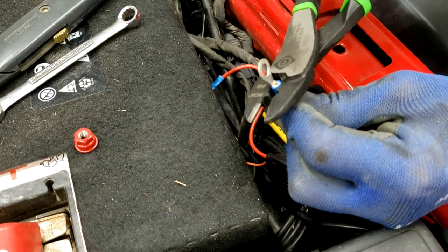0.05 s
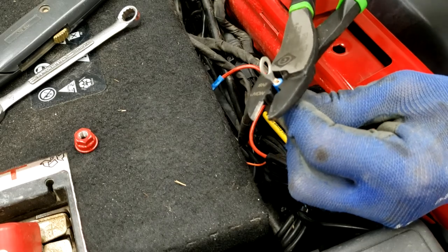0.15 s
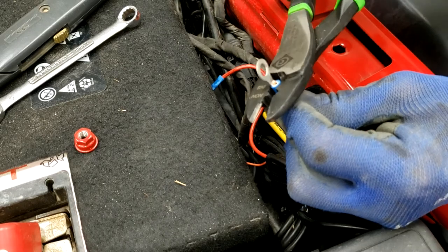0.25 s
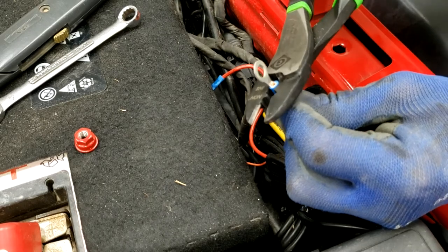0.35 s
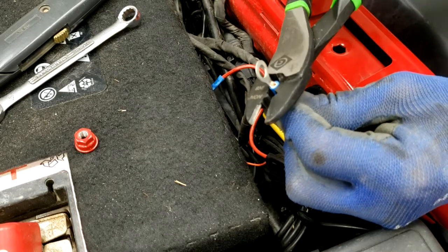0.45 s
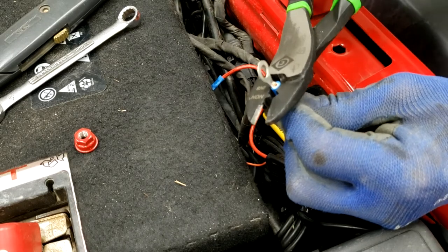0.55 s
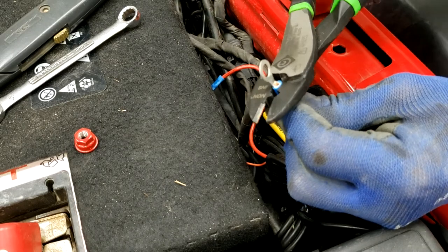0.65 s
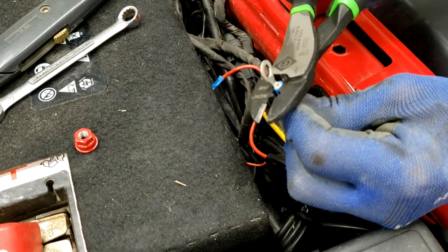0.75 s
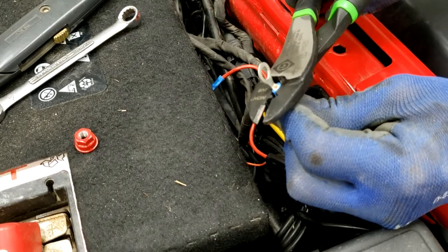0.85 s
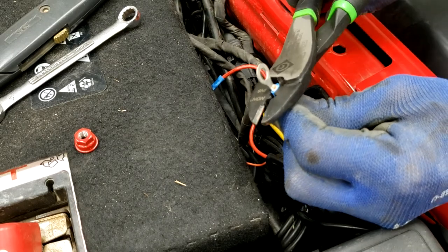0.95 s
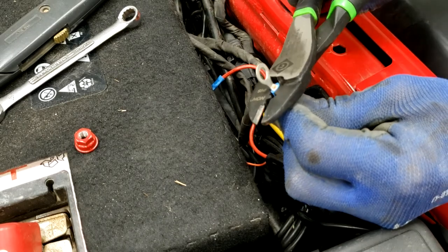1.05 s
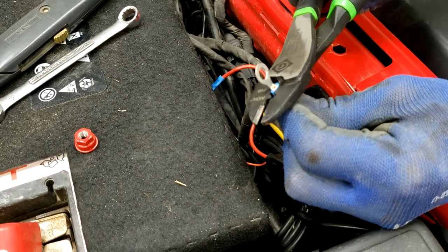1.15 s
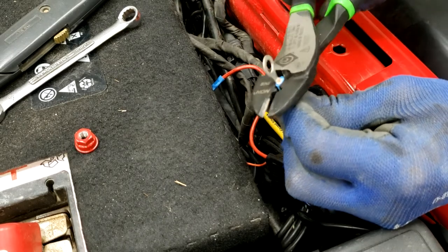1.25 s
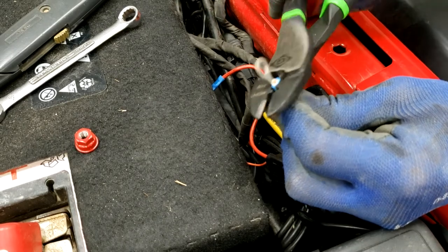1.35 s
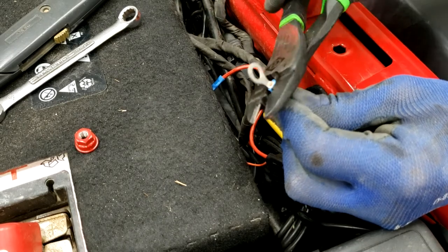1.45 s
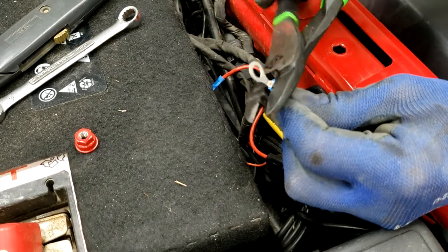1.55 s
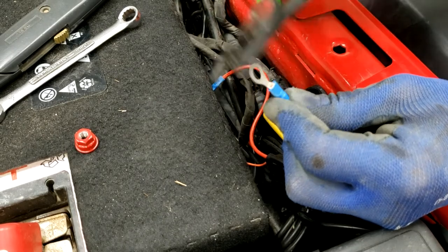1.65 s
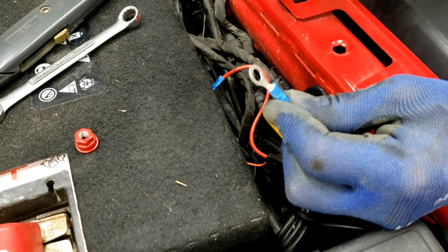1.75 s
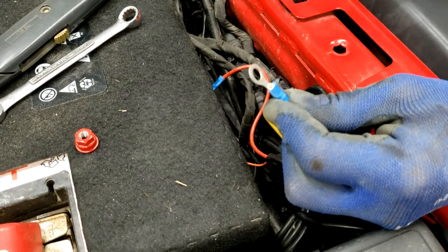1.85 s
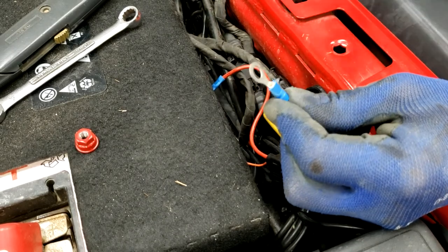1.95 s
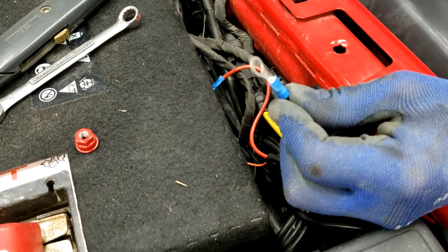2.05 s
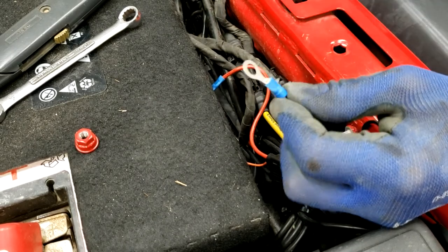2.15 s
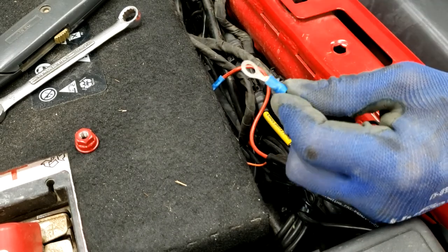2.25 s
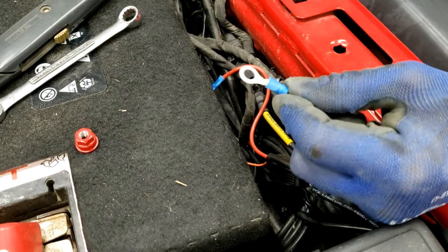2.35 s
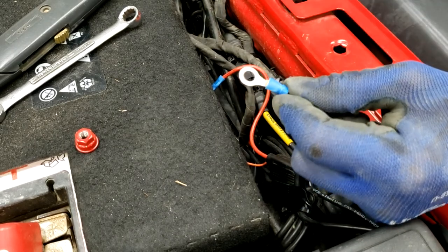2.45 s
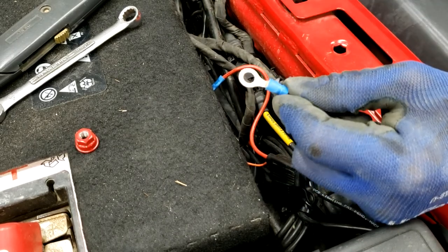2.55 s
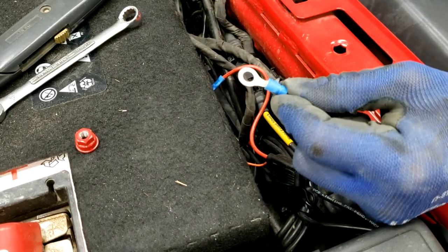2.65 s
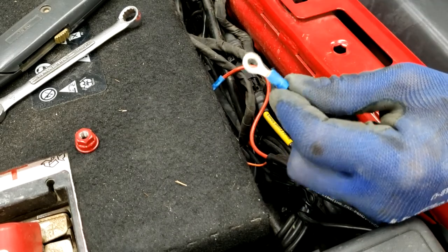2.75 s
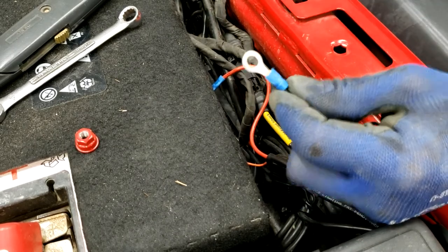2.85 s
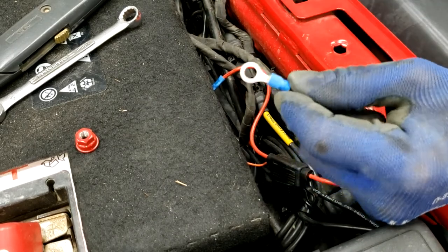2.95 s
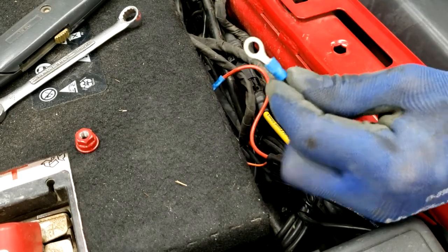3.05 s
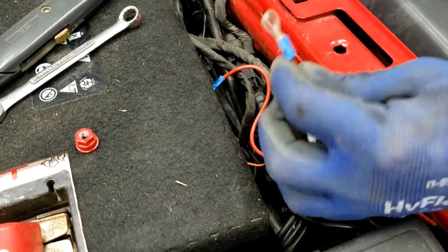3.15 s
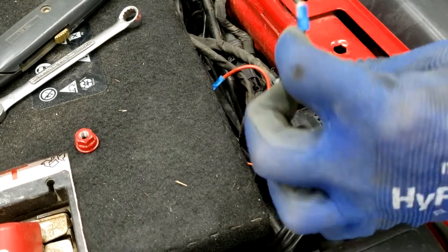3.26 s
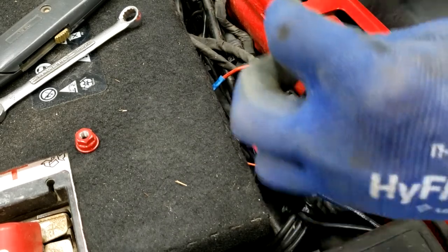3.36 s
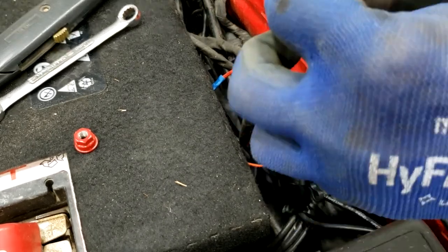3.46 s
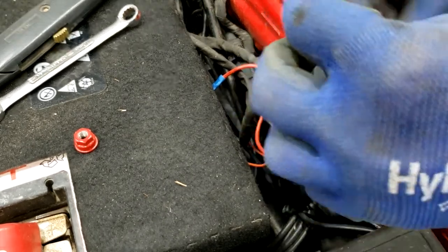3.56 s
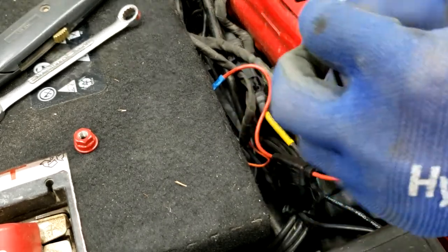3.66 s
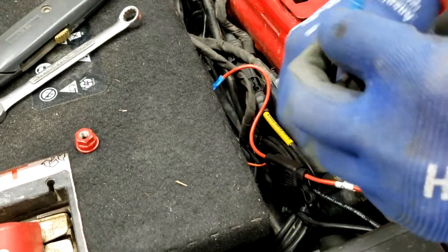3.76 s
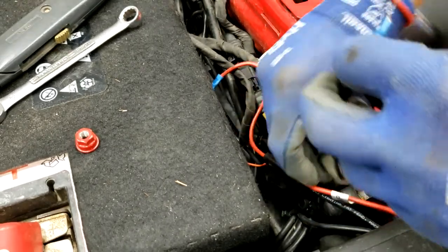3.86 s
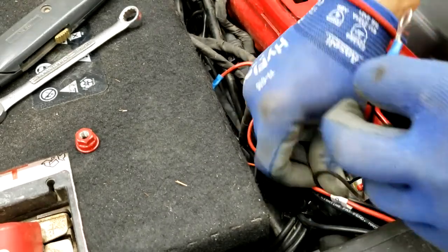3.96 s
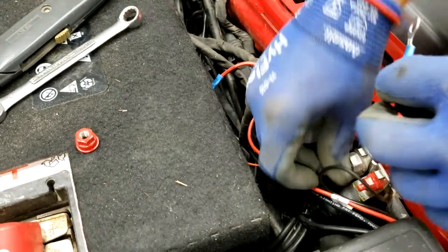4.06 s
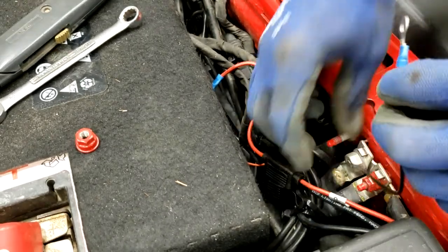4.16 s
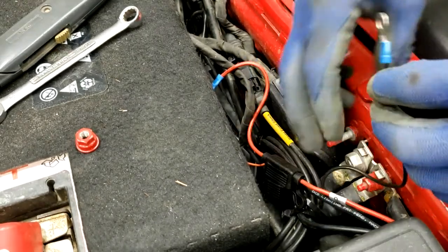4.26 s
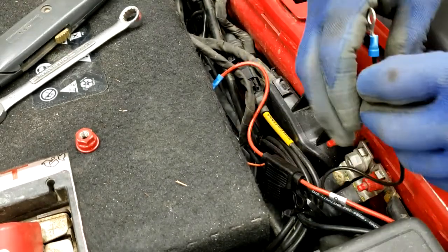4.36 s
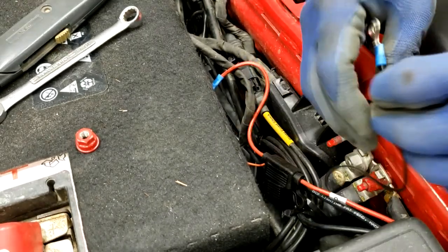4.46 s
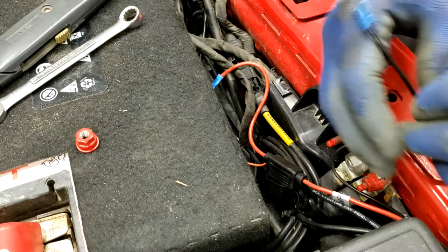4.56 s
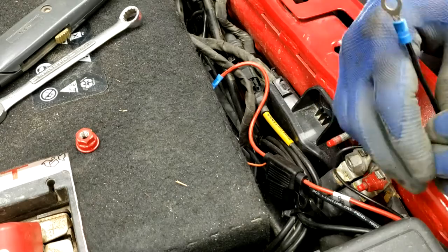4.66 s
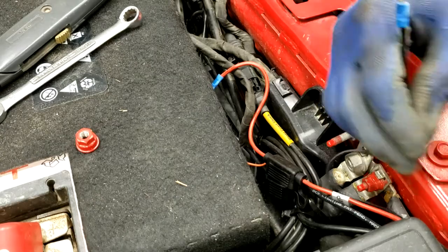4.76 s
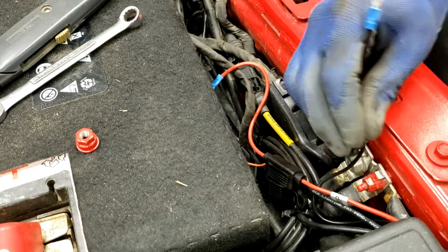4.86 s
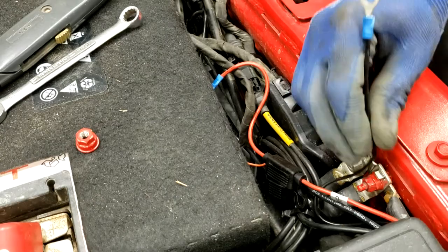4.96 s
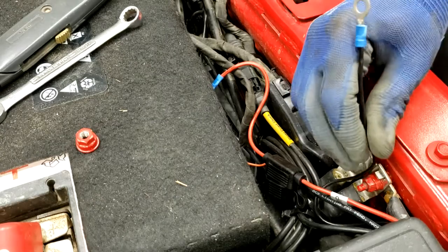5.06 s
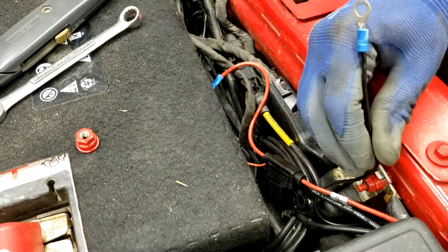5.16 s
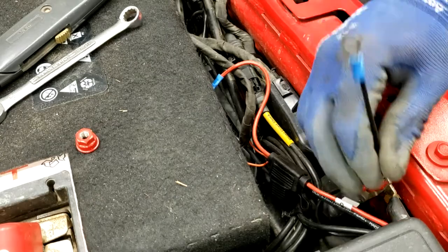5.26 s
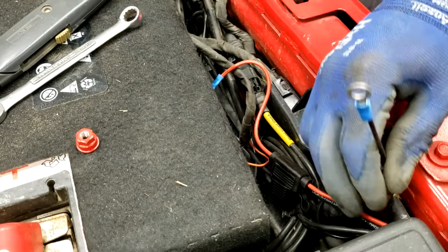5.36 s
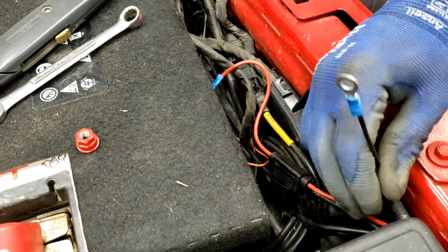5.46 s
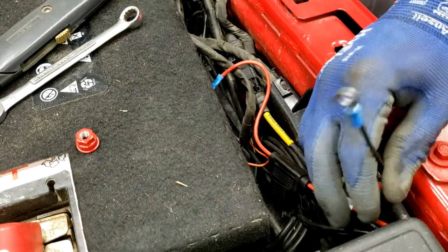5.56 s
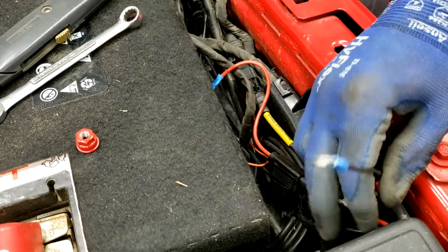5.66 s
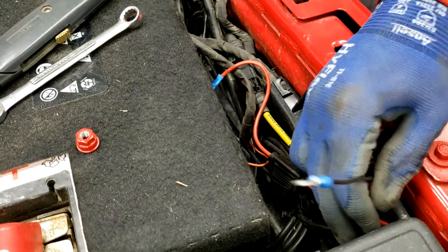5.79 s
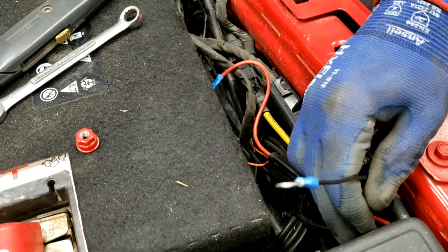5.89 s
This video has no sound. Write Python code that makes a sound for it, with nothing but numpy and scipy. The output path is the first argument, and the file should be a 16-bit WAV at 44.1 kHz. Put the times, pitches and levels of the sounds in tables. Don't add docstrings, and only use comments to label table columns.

```python
import sys
import numpy as np
from scipy import signal
from scipy.fft import rfft, irfft, next_fast_len
from scipy.io import wavfile

SR = 44100
rng = np.random.default_rng(int(sys.argv[2]) if len(sys.argv) > 2 else 0)


def boost(x):
    u = np.asarray(x, float) / 20
    return 10 ** u


def transcribe(u):
    v = np.clip(np.atleast_2d(u).T, -1, 1)
    q = np.round(v * 32767).astype(np.int16)
    wavfile.write(sys.argv[1], SR, q)


N = 261287

# frequency_hz, level_db, t60_s
HOLLOW_MODES = [(142.6, -9, 0.19), (248.4, -11, 0.14), (278, 4.5, 0.13), (347, -19, .08), (424, -3, 0.14),
                (502.5, 2.5, 0.14), (615, -21, 0.06), (825, -23, .08), (1210, 10, 0.025),
                (1780, -10, 0.023), (2720, 3, 0.028), (3930, -17, .02), (5070, -16, .04)]
# frequency_hz, level_db, t60_s
COVER_MODES = [(79.4, -8, 0.11), (120.3, -12, 0.35), (147, -11, 0.21), (194.6, -1.5, 0.064),
               (225.5, 2.5, 0.068), (294, -3, 0.022), (310, -1.5, 0.043), (462, -8.5, 0.045),
               (520, -15, 0.04), (776, -2, 0.01), (840, -22, 0.028), (1010, -27, 0.018),
               (1178, -20.5, 0.059), (1740, -4, 0.022), (2310, -13, 0.028)]
# frequency_hz, density_db_per_hz
CRACK_SPECTRUM = [(290, -4), (500, -3.5), (1210, -15), (2460, -17.5), (3290, -22.5), (4210, -31),
                  (9090, -48), (10700, -39.5), (14700, -50), (16000, -55)]
# frequency_hz, density_db_per_hz
SNAP_SPECTRUM = [(300, -15), (600, -6.5), (900, -11), (1350, -8), (2210, -20), (2800, -17.5), (3630, -26),
                 (5050, -23), (7940, -36), (9760, -27.5), (16000, -48)]


def rms_one(x):
    return x / np.sqrt(np.mean(x ** 2) + 1e-20)


def filtered(x, order, hz, kind="low"):
    return signal.sosfilt(signal.butter(order, hz, kind, fs=SR, output="sos"), x)


def in_time(rows):
    s, *columns = np.transpose(rows)
    return [np.interp(np.arange(N) / SR, s, c, left=-150, right=-150) for c in columns]


def at_hz(points, hz):
    table_hz, values = np.array(points).T
    return np.interp(np.log(hz), np.log(table_hz), values)


def drift(rate):
    r = np.exp(-80 * np.pi * rate / SR)
    noise = rng.standard_normal(N // 40 + 2002)
    slow = signal.lfilter([1], [1, -2 * r, r * r], noise)[2000:]
    return np.interp(np.arange(N) / 40, np.arange(len(slow)), rms_one(slow))


def swells(rows, rise_s, fall_db_per_s):
    t = np.arange(N) / SR
    total = 0
    for s, db, hold in rows:
        fall_db = fall_db_per_s * np.maximum(t - s - hold, 0)
        total = total + boost(db - fall_db) * np.clip(1 + (t - s) / rise_s, 0, 1)
    return total


def coloured(x, spectrum):
    size = next_fast_len(x.shape[-1])
    hz = np.maximum(np.fft.rfftfreq(size, 1 / SR), 1)
    return irfft(rfft(x, size) * boost(at_hz(spectrum, hz)), size)[..., :x.shape[-1]]


def resonate(x, hz, width_hz):
    r = np.exp(-np.pi * width_hz / SR)
    poles = [1, -2 * r * np.cos(2 * np.pi * hz / SR), r * r]
    return signal.lfilter([(1 - r * r) / 2, 0, (r * r - 1) / 2], poles, x)


def resonate_twice(x, hz, width_hz):
    return resonate(resonate(x, hz, width_hz), hz, width_hz)


def ringing(force, hz, t60):
    r, w = boost(-60 / (t60 * SR)), 2 * np.pi * hz / SR
    return signal.lfilter([0, np.sin(w)], [1, -2 * r * np.cos(w), r * r], force)


def shaken(modes):
    return rms_one(sum(boost(db) * ringing(rng.standard_normal(N), hz, t60) for hz, db, t60 in modes))


def strike(blows, modes, scatter_db):
    first = round(blows[0][0] * SR)
    span = round((blows[-1][0] - blows[0][0] + .6) * SR)
    out = np.zeros(N + SR)
    luck = rng.standard_normal((len(blows), 16))
    t = np.arange(int(SR * .012)) / SR
    for k, (hz, mode_db, t60) in enumerate(modes):
        force = np.full(span, 1e-18)
        for (s, blow_db, ms), chance in zip(blows, luck):
            push = np.sin(np.pi * np.minimum(t / (max(ms, .05) / 2000), 1))
            gain = boost(blow_db + mode_db + scatter_db * chance[k])
            force[max(round(s * SR) - first, 0):][:len(t)] -= push / push.sum() * gain
        out[first:first + span] += (-1) ** (k // 3) * ringing(force, hz, t60)
    return out[:N]


def burst(ms):
    t = np.arange(int(.12 * SR)) / SR
    shared, own = rng.standard_normal(len(t)), rng.standard_normal((2, len(t)))
    return (0.64 * shared + 1.58 * own) * boost(-60000 * t / max(ms, 2)) * (1 - np.exp(-t / 0.00026))


def grainy(per_s, spread_db):
    sizes = boost(spread_db * np.minimum(rng.exponential(1, N), 3)) * (rng.random(N) < per_s / SR)
    return rng.standard_normal((2, N)) * (1 + sizes) + 0.09 * rng.standard_normal(N)


def add(out, s, sound):
    i = round(s * SR)
    out[:, i:i + sound.shape[1]] += sound[:, :N - i]


def pan(x, db):
    return x * boost(np.array([[db / 2], [-db / 2]]))


def lagged(x, count):
    return np.array([np.roll(x[0], count), x[1]])


def narrowed(x):
    side = filtered((x[0] - x[1]) / 2, 2, 1070, "high")
    return x.mean(axis=0) + side * [[1], [-1]]


def tool(table, modes, spectrum, crack_ms, scatter_db, shock_db):
    body = strike([(s, db, ms) for s, db, _, ms in table], modes, scatter_db)
    crack, shock = np.zeros((2, N)), np.zeros((2, N))
    for s, _, crack_db, ms in table:
        keep = np.exp(-2 * np.pi * 16000 / ms ** 2.4 / SR)
        add(crack, s, boost(crack_db) * signal.lfilter([1 - keep], [1, -keep], burst(crack_ms)))
        jerk = np.hanning(int(ms * SR / 1200) + 3) * [[1], [1]]
        add(shock, s, -boost(crack_db + shock_db) * jerk)
    return body + shock + boost(21.0) * coloured(crack, spectrum)


def workshop():
    # time_s, level_db
    hum = [(0, -45.5), (1.3, -46.5), (2.1, -47), (2.9, -48.5), (4.44, -49.5), (5.15, -45), (5.925, -46)]
    # frequency_hz, density_db_per_hz
    air_spectrum = [(15, -66), (25, -48), (49, -5), (62, -26), (76, 4), (92, 0), (118, -5.5), (179, -4),
                    (253, -5.5), (301, -4), (630, -10), (846, -6), (1250, -13.5), (2440, -20), (9000, -54),
                    (11700, -91), (19800, -120)]
    # frequency_hz, width_hz, level_db
    machines = [(81.3, 16, -66.5), (191.5, 26.4, -58.5), (301.6, 36, -59), (433.4, 81, -59),
                (828, 37, -61.5)]
    # frequency_hz, left_right_likeness
    likeness = [(60, 0.93), (180, 1), (550, 0.46), (1650, -0.29), (4970, -0.11), (15000, -0.03)]
    # frequency_hz, left_right_db
    balance = [(60, 0), (240, -2.5), (950, 0), (3770, 5.5), (15000, 27)]
    size = next_fast_len(N)
    hz = np.maximum(np.fft.rfftfreq(size, 1 / SR), 1)
    mid, side = rfft(rng.standard_normal((2, size)))
    alike, lean = np.clip(at_hz(likeness, hz), 0, 1), boost(at_hz(balance, hz) / 2)
    mid, side = np.sqrt(1 + alike) * mid, np.sqrt(1 - alike) * side
    pair = np.array([(mid + side) * lean, (mid - side) / lean])
    air = boost(1.5) * rms_one(irfft(pair * boost(at_hz(air_spectrum, hz)), size)[:, :N])
    air = air * boost(.6 * drift(6))
    drones = sum(boost(db + 47) * rms_one(resonate_twice(rng.standard_normal(N), f, width))
                 for f, width, db in machines)
    return boost(in_time(hum)[0]) * (air + drones)


def shop_echo(x):
    t60_s, wall_hz = 0.3, 3220
    size = next_fast_len(N + SR)
    hz, spectrum = np.fft.rfftfreq(size, 1 / SR), rfft(x, size)
    out = np.zeros((2, len(hz)), complex)
    for k, lag in enumerate(rng.uniform(.012, .045, 12)):
        delay = np.exp(-2j * np.pi * hz * lag)
        loop = boost(-60 * lag / t60_s) / (1 + 1j * hz / wall_hz / 4) * delay
        out[k % 2] += (-1) ** (k // 2) * loop / (1 - loop) * spectrum / (1 + 1j * hz / wall_hz)
    return irfft(out, size)[:, :N]


def gloves():
    # start_s, length_s, level_db, dark_part_db
    rubs = [(0.187, 0.13, -56.5, 2.5), (0.862, 0.054, -65, 2), (1.363, 0.11, -57, 3), (1.433, 0.14, -58, 2),
            (1.65, 0.085, -57.5, 1), (1.918, 0.13, -76, 15.5), (2.212, 0.083, -49, 10),
            (2.285, 0.057, -47.5, 8.5), (2.327, 0.21, -61.5, 15), (2.487, 0.29, -73.5, 14),
            (3.093, 0.12, -69, -13), (3.211, 0.086, -68.5, 12), (3.766, 0.15, -65, 8.5),
            (3.821, 0.054, -68, 15.5), (4.105, 0.069, -75, 2), (4.481, 0.061, -65, 3),
            (4.579, 0.029, -61, 15.5), (4.644, 0.019, -66, 17.5), (4.736, 0.052, -50, -8),
            (4.822, 0.1, -64, 1), (4.86, 0.088, -63, 9), (4.947, 0.1, -64, -12)]
    # start_s, length_s, level_db, dark_part_db
    moves = [
        (1.498, 0.99, -72.5, 10),
        (3.1, 0.4, -70, -3),
        (3.604, 1, -71, 8),
        (4.495, 0.62, -64.5, 7.5),
    ]
    # start_s, length_s, level_db, pitch_hz
    swishes = [(3.096, 0.13, -68, 11400), (3.2, 0.27, -80, 9500), (4.73, .045, -55, 5600),
               (5.1, .2, -61, 9400), (5.599, 0.35, -60, 3900), (3.757, .1, -75, 10900),
               (5.476, .06, -58, 12000)]
    # frequency_hz, density_db_per_hz
    knit = [(1470, -4), (2500, -2), (4480, -8.5), (5610, -8.5), (8660, -11.5), (11100, -6.5), (15200, -11),
            (16000, -34)]
    rub = rms_one(coloured(grainy(per_s=1500, spread_db=3.5), knit))
    rub = rub * boost(3.0 * drift(40))
    dull = filtered(rub, 2, 7000)
    out = np.zeros((2, N))
    for s, length, rub_db, dull_db in rubs + moves:
        i, swell = round(s * SR), np.linspace(0, 1, int(length * SR))
        stroke = (rub - dull + boost(dull_db) * dull)[:, i:i + len(swell)]
        add(out, s, boost(rub_db) * np.sin(np.pi * swell ** 0.41) * stroke)
    for s, length, swish_db, hz in swishes:
        swell = np.hanning(int(length * SR))
        slide = rms_one(resonate_twice(rng.standard_normal((2, len(swell))), hz, 1500))
        add(out, s, boost(swish_db) * swell ** .5 * slide)
    return pan(out, 0.95)


def wire():
    # time_s, level_db
    pull = [(5.042, -49.5), (5.085, -50), (5.15, -46), (5.3, -56.5), (5.355, -51.5), (5.41, -60),
            (5.44, -54), (5.475, -55), (5.505, -44), (5.58, -65), (5.76, -64.5), (5.85, -57), (5.93, -65)]
    # frequency_hz, width_hz, level_db
    harness = [(2760, 98, 1), (3340, 380, 2), (3770, 71, -3), (4370, 230, -13), (6000, 150, -19),
               (6750, 150, -25), (9300, 200, -22)]
    # frequency_hz, density_db_per_hz
    sleeve = [(2650, -2.5), (4500, -40), (4900, -13), (8370, -5.5), (9210, -2), (10100, -1), (12300, 5.5),
              (13800, -7), (15100, 2), (16000, -16)]
    hiss_db, = in_time(pull)
    rib_db = -49.5 + 0.21 * (hiss_db + 55) - 6.5 * (np.arange(N) / SR - pull[0][0])
    rib_db = rib_db - 60 * (hiss_db < -100)
    slip = grainy(per_s=1800, spread_db=3.5) * boost(1.6 * drift(60))
    slip = lagged(slip + 0.24 * slip[1], count=13)
    ribs = sum(boost(db + 1.6 * drift(8.7)) * resonate(slip, hz, 1.75 * width) for hz, width, db in harness)
    ribs = ribs + 0.12 * resonate(resonate(slip, 3200, 2600), 3860, 3100)
    flare = swells([(5.09, -56, 0)], rise_s=0.039, fall_db_per_s=69)
    hiss = boost(hiss_db) * rms_one(coloured(slip, sleeve))
    return pan(hiss, -5.5) + pan((boost(rib_db) + flare) * rms_one(ribs), 1.0)


def ticks():
    # start_s, peak_db, pitch_hz, top_above_8_khz_db,
    # left_right_db
    parts = [(3.011, -48, 2570, -82, 7), (3.224, -37.5, 3080, -48, 1), (3.8312, -34.5, 2480, -49, 1),
             (3.9893, -40, 3150, -74, 9), (4.511, -55, 2800, -71, 4.5), (4.6444, -46, 3500, -47, -5),
             (4.8578, -41, 3340, -41, 6), (5.0286, -30, 3150, -47, -1), (5.0563, -40, 3000, -55, 0),
             (5.075, -21.5, 3250, -39, -1), (5.097, -33, 3200, -60, 0), (5.1521, -40, 3300, -57, 0),
             (5.3067, -53, 3200, -58, 3), (5.4244, -54, 3200, -60, 0), (5.706, -39.5, 3180, -62, 12),
             (0.192, -52.5, 5900, -48, -4), (0.86, -54, 4500, -56, 1), (1.551, -53, 4230, -71, 10),
               (1.5996, -48, 5200, -52, 0), (1.6591, -61, 5300, -58, 5.0), (1.673, -50, 5700, -65, 9),
               (1.687, -54, 5490, -42, -2.5), (1.8194, -59, 7800, -78.5, 5), (2.491, -39, 4700, -51, 3),
               (3.6282, -65, 7140, -77, 14), (3.7304, -69, 4910, -63, 4), (3.879, -62, 4950, -57, 7),
               (4.254, -49.5, 5970, -54, 11), (4.5832, -41, 4960, -67, 7), (4.836, -60, 7760, -60, 9),
               (4.874, -47, 4880, -49, 1.5), (4.933, -57, 7540, -36, -2), (2.4605, -58, 6000, -54, -1),
               (5.0288, -42.5, 9000, -56, -4), (5.076, -38, 7500, -50, 5), (5.39, -55, 5100, -70, 5)]
    out = np.zeros((2, N))
    for s, peak_db, hz, top_db, side_db in parts:
        noise = burst(24 * boost(-0.12 * (max(peak_db, top_db) + 51.5)))
        edge = resonate(resonate(noise, 12000, 6000), 9900, 7000)
        pitch = resonate(resonate(noise, hz, .5 * hz), hz, 0.42 * hz)
        add(out, s, pan(boost(peak_db + 5.5) * pitch + boost(top_db + 2.0) * edge, side_db))
    return out


def taps():
    # start_s, level_db, contact_ms
    touches_of_parts = [
        (3.842, -54, 0.18),
        (3.960, -37.5, 0.17),
        (4.116, -42.5, 2.1),
        (4.585, -52, 0.37),
        (5.077, -35, 1.3),
        (5.385, -39, 1),
    ]
    # frequency_hz, level_db, t60_s
    plastic = [(284, -8, 0.069), (467, 6.5, 0.046), (990, -1.5, 0.019), (1930, 6.5, 0.0062)]
    return strike(touches_of_parts, plastic, 3.8)


def jaws():
    # start_s, level_db, t60_s, broad_share
    contacts = [
        (1.430, -54, .2, .3),
        (1.9075, -27, .024, .15),
        (1.913, -55, .5, .25),
    ]
    # frequency_hz, width_hz
    steel = [(2050, 400), (3250, 500), (5150, 450), (8300, 600), (10700, 600), (11900, 600)]
    steel_levels = [-11, 0, -4, -17, -23, -20]
    out, t = np.zeros((2, N)), np.arange(SR // 2) / SR
    for s, db, t60, broad in contacts:
        noise = rng.standard_normal((2, len(t)))
        ring = sum(boost(mode_db) * resonate_twice(noise, hz, width)
                   for (hz, width), mode_db in zip(steel, steel_levels))
        click = rms_one(resonate(resonate(noise, 3600, 4000), 3600, 5000))
        add(out, s, boost(db - 60 * t / t60) * (rms_one(ring) + broad * click))
    return out


def sway():
    rocks = [2.234, 2.353, 2.523, 2.624, 2.697, 2.775, 2.944, 3.069]
    # frequency_hz, level_db, t60_s
    support = [(44.8, -5, 0.33), (80.1, 2, 0.28)]
    pushes = [(s, -24.5 - 28.5 * max(s - rocks[1], 0), 7.8) for s in rocks]
    return resonate(strike(pushes, support, 0.81), 73, 60.3)


def touches():
    # start_s, level_db, contact_ms
    contacts = [(2.4445, -24, 4.9), (2.4635, -21.5, 4.5), (2.480, -25, 4.6), (2.496, -24.5, 2.8),
                (2.5125, -20.5, 6.1), (2.526, -24, 2.6), (2.544, -26, 4.9), (2.558, -26, 2.1),
                (2.605, -29, 5.6), (2.621, -30.5, 5.2), (2.644, -35, 3), (2.712, -39, 4.1),
                (2.787, -41, 4.1)]
    # frequency_hz, level_db, t60_s
    panel = [(158.3, -6.5, 0.2), (190, 1.5, 0.26), (224, -11, 0.1), (338, -5, 0.059)]
    return strike(contacts, panel, 2.7)


def settling():
    # start_s, rumble_db, hold_s, grinding_relative_db
    rocking = [
        (2.223, -20.5, 0.0055, 4),
        (2.272, -24, 0.042, -1),
        (2.34, -17.5, 0.022, -2.5),
        (2.407, -21, 0.0055, -7),
        (2.46, -26, 0.071, -17),
        (2.61, -45, 0.048, -18),
        (2.78, -45.5, 0.021, -30),
    ]
    rest_s, rest_fall = 2.514, 96
    grit_rise_s, shake_s, shake_rise_s = 0.0034, 1.52, .03
    rumble = swells([(s, db, hold) for s, db, hold, _ in rocking], 0.013, 357)
    rumble = rumble + swells([(rest_s, -35, 0)], 0.042, rest_fall)
    grind = swells([(s, db + grit_db, hold) for s, db, hold, grit_db in rocking], grit_rise_s, 432)
    grind = grind + swells([(rest_s, -32, 0)], 0.18, rest_fall)
    ring = swells([(shake_s, -35, 0)], shake_rise_s, 38)
    rattle = swells([(1.44, -30.5, 0)], grit_rise_s, 276.5) + swells([(shake_s, -45, 0)], shake_rise_s, 42)
    grit = filtered(grainy(per_s=1100, spread_db=5.5), 1, 3500)
    low = rumble * resonate(shaken(COVER_MODES[1:6]), 213, 260)
    gritty = shaken(COVER_MODES[6:13]) + 0.58 * rms_one(coloured(grit, CRACK_SPECTRUM))
    hollow = ring * shaken(HOLLOW_MODES[2:6])
    chatter = rattle * boost(1.0) * rms_one(coloured(grit, SNAP_SPECTRUM))
    return low + grind * boost(-1.5) * gritty + hollow + chatter


def landing():
    # start_s, blow_db, crack_db, contact_ms
    bounces = [(2.2138, -22, -7, 0.67), (2.2150, -5.5, -17.5, 1.25), (2.220, -43, -11.5, 4.5),
               (2.2315, -24, -28, 1.7), (2.240, -21, -27, 3), (2.2501, -20, -27, 2.7),
               (2.259, -33, -38, 2.7), (2.2716, -14, -33, 0.99), (2.288, -18, -16, 0.62),
               (2.297, -25, -29, 1.9), (2.308, -19, -32, 2), (2.322, -26, -36, 3), (2.339, -16, -20, 0.88),
               (2.3417, -11.5, -30, 2.1), (2.348, -14, -16, 0.66), (2.3525, -17, -25, 1.5),
               (2.364, -40, -45, 0.74), (2.371, -20, -33, 1.3), (2.400, -26, -53, 12),
               (2.410, -16, -29.5, 1.8), (2.424, -17, -31, 4.1), (2.461, -21, -30, 1.9),
               (2.492, -32, -30, 3.5)]
    # frequency_hz, level_db, t60_s
    handles = [(696, -3.5, 0.078), (783, -5, .05), (985, -9, 0.026), (1240, -9, .05), (1620, -15, 0.044),
               (1745, -16, 0.066), (2240, -15, 0.081), (3100, -8, 0.068), (3500, -22, .06)]
    cover = tool(bounces, COVER_MODES, CRACK_SPECTRUM, crack_ms=20.3, scatter_db=-1.0, shock_db=6.0)
    return cover + strike([(s, crack_db - 7.5, ms / 2) for s, _, crack_db, ms in bounces], handles, 2.0)


def hollow_knock():
    # start_s, blow_db, crack_db, contact_ms
    knocks = [(1.4235, -25.5, -20, 0.31), (1.4264, -29.5, -26, 1.8), (1.4300, -17, -70, 3.8),
              (1.4336, -14, -72, 5.2), (1.4444, -20, -70, 5.3), (1.4589, -22, -80, 4),
              (1.4665, -26, -70, 4.2), (1.478, -41, -60, 2.6), (1.51, -33, -56, 4.5), (1.535, -32, -59, 3),
              (1.584, -32.5, -68, 3.5), (1.604, -31, -70, 3.56), (1.666, -27, -69, 5.1),
              (1.6696, -31, -70, 6.5), (1.6768, -31.5, -64, 5.6), (1.6878, -40, -67, 5.3)]
    # start_s, level_db, contact_ms
    loose_part = [
        (1.464, -23, 2.0),
        (1.480, -30, 2.0),
        (1.494, -30, 2.0),
        (1.508, -34, 2.0),
    ]
    knock = tool(knocks, HOLLOW_MODES, SNAP_SPECTRUM, crack_ms=41.0, scatter_db=4.5, shock_db=-20.0)
    return filtered(knock, 2, 150, "high") + strike(loose_part, HOLLOW_MODES[4:5], 1.0)


def scene():
    handling = narrowed(hollow_knock() + landing() + touches() + settling())
    handling = lagged(pan(handling, -1.2), count=5)
    sharp = filtered(handling, 3, 95, "high")
    sharp = sharp + taps() + ticks()
    echo = boost(-18) * shop_echo(sharp.mean(axis=0))
    return sharp + echo + sway() + jaws() + gloves() + wire() + workshop()


def band_limit(x):
    return signal.sosfilt(signal.butter(12, 16530, fs=SR, output="sos"), x)


def record(dry):
    # frequency_hz, density_db_per_hz
    self_noise = [(1760, -10), (3000, 1.5), (3240, -10), (3890, -6.5), (5180, -41), (7460, -17.5),
                  (8640, -28), (12100, -16.5), (15100, -19), (16000, -13)]
    hiss = boost(-66) * rms_one(coloured(rng.standard_normal(dry.shape), self_noise))
    top_cut = signal.cheby2(18, 50, 16050, fs=SR, output="sos")
    cut = signal.sosfilt(top_cut, np.clip(dry + hiss, -1, 1))
    return band_limit(np.clip(cut, -1, 1))


dry = scene()
out = record(dry)
transcribe(out)
```